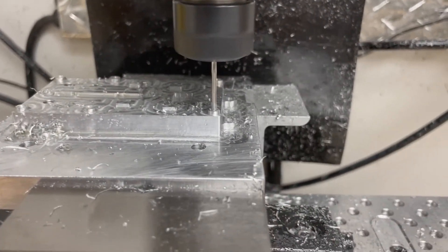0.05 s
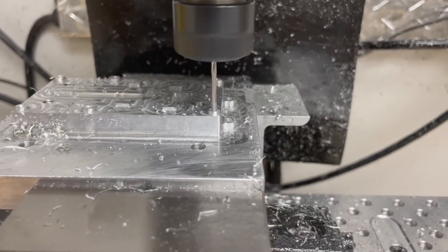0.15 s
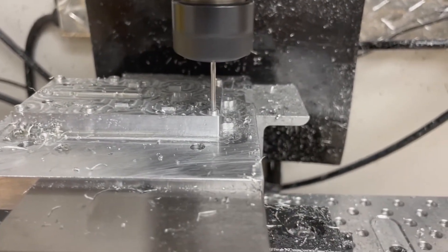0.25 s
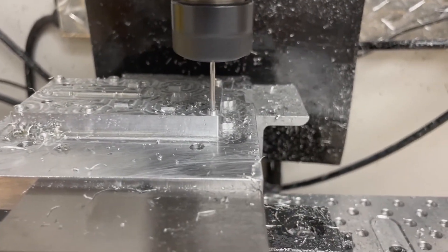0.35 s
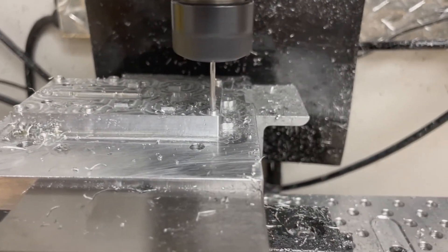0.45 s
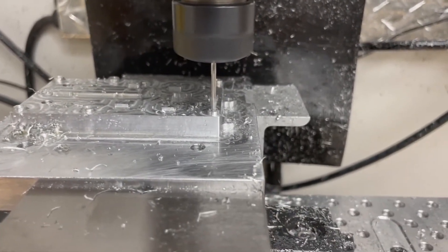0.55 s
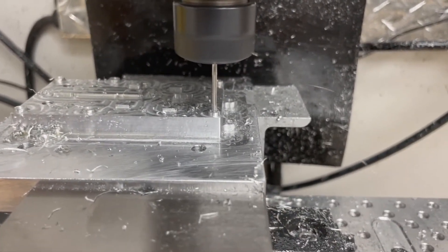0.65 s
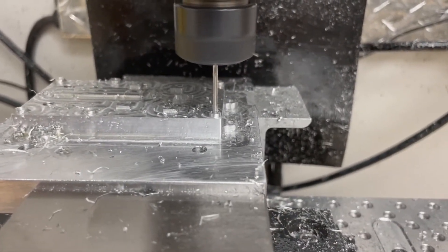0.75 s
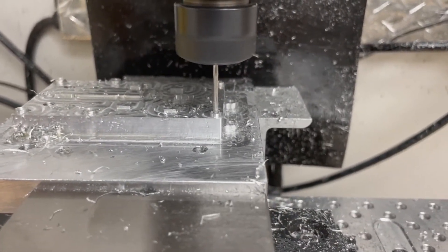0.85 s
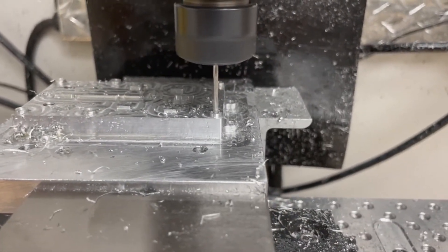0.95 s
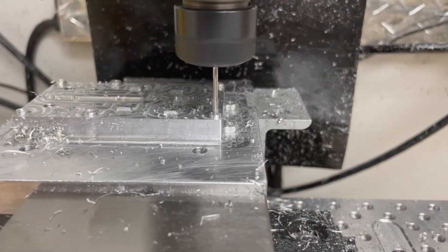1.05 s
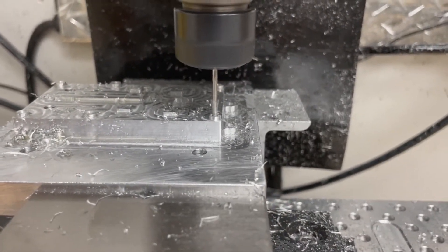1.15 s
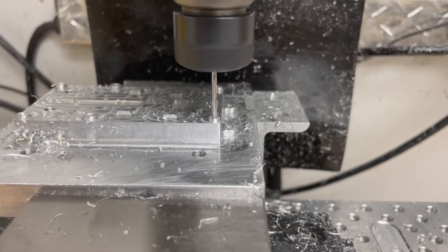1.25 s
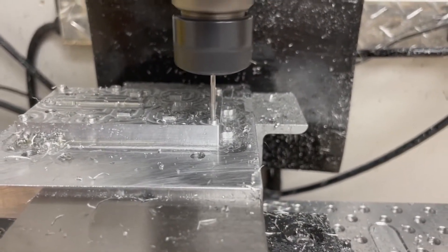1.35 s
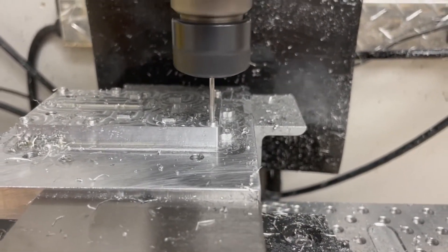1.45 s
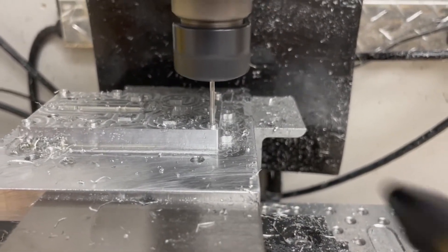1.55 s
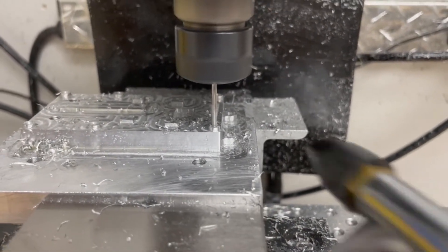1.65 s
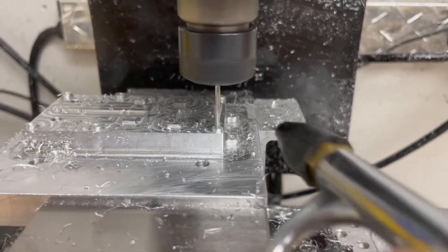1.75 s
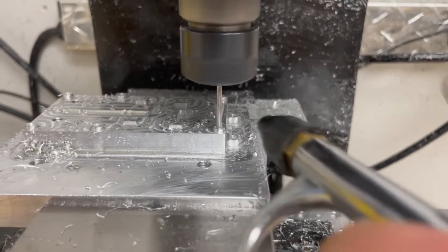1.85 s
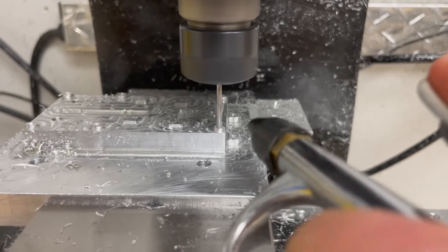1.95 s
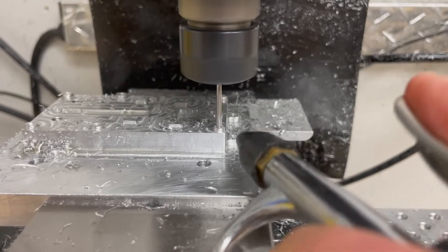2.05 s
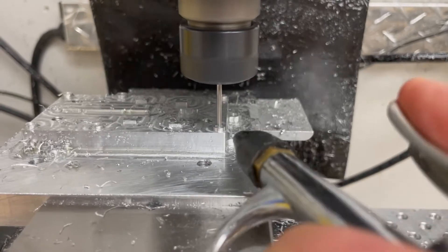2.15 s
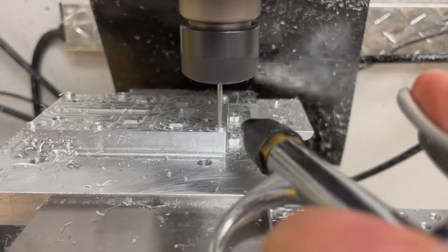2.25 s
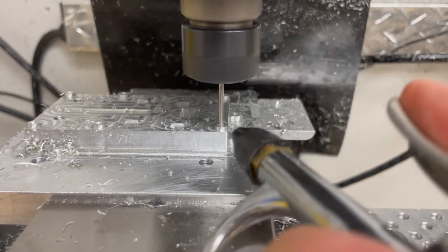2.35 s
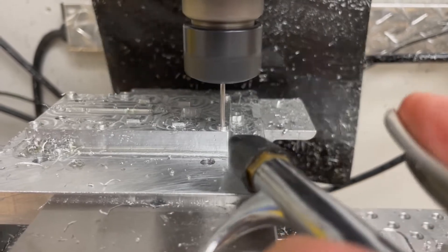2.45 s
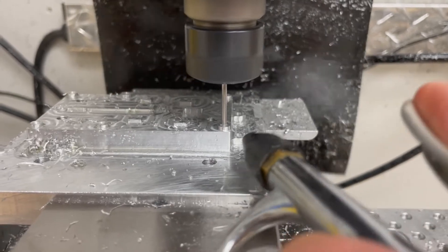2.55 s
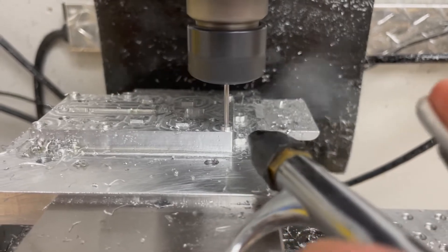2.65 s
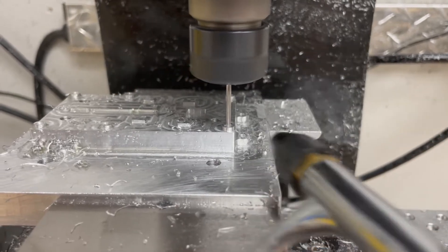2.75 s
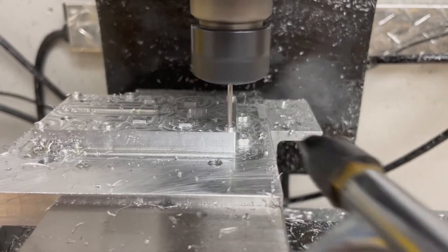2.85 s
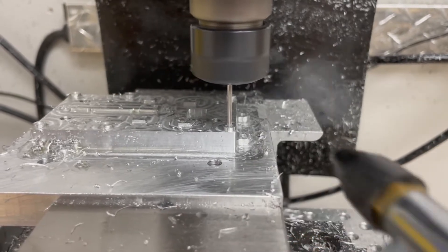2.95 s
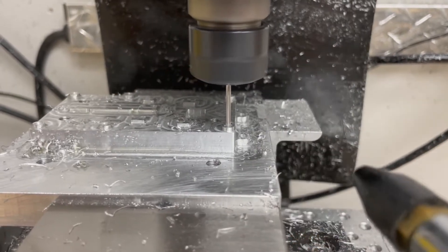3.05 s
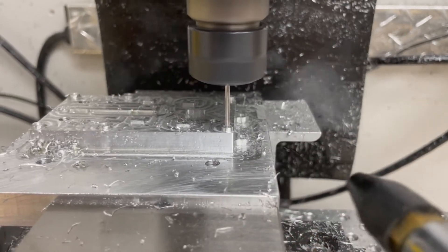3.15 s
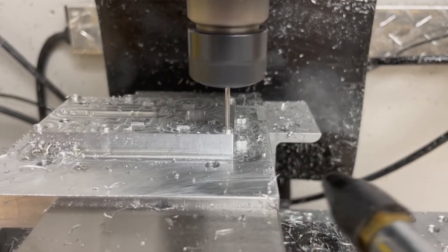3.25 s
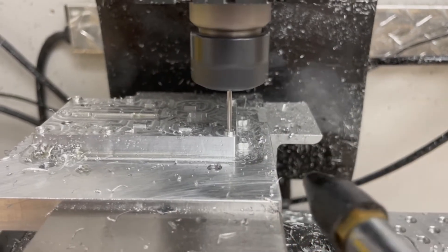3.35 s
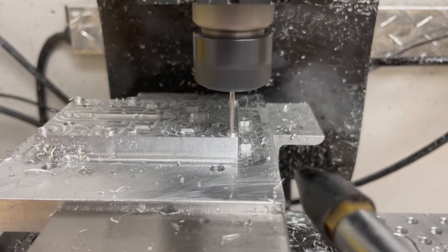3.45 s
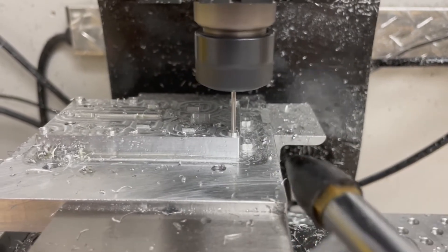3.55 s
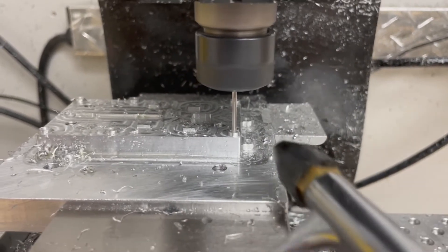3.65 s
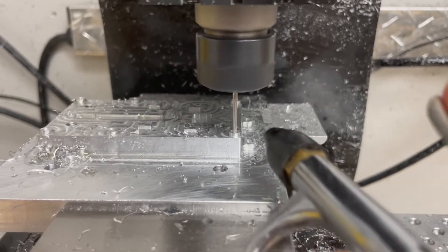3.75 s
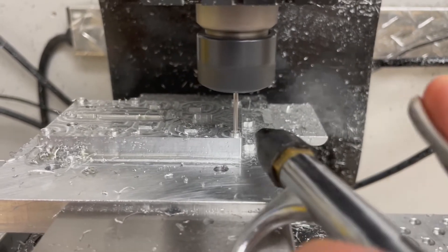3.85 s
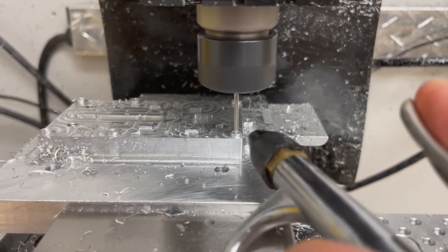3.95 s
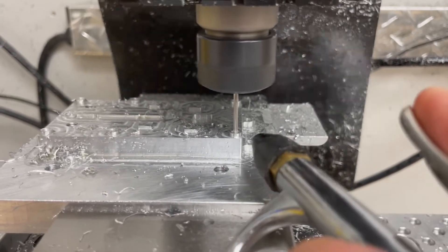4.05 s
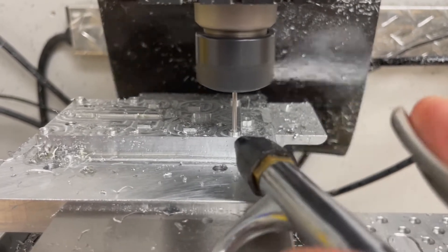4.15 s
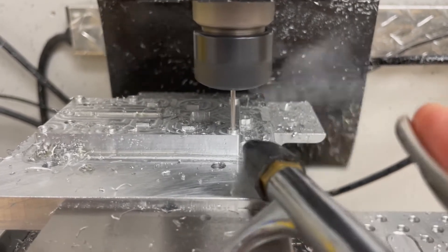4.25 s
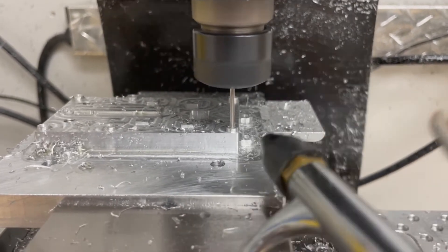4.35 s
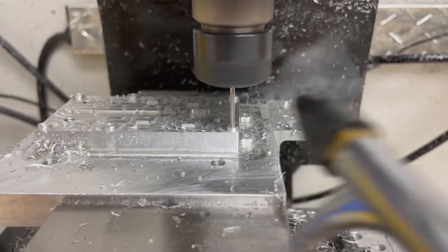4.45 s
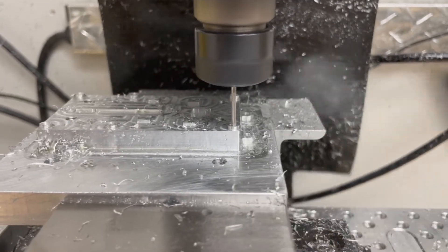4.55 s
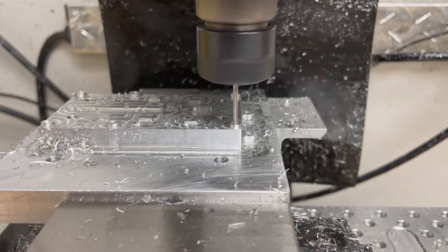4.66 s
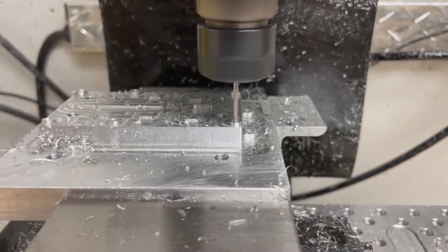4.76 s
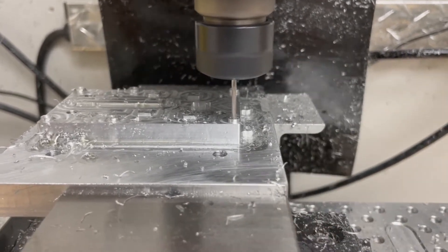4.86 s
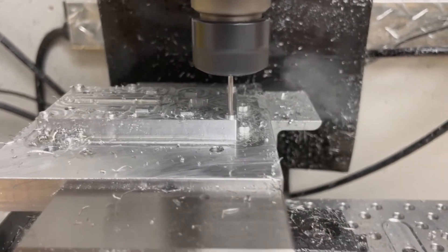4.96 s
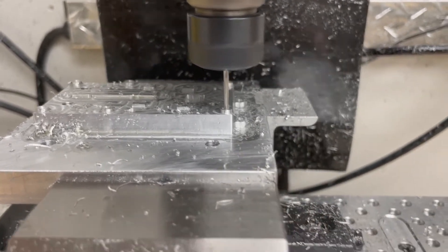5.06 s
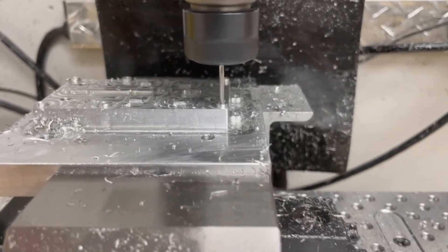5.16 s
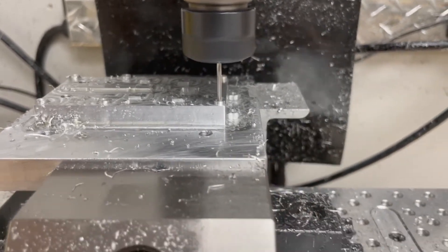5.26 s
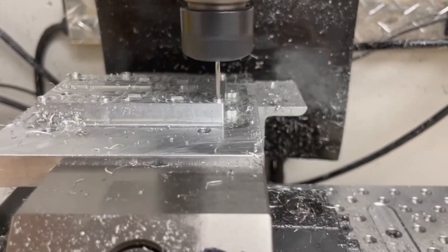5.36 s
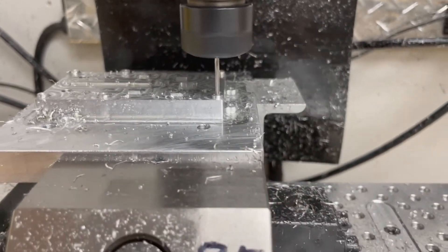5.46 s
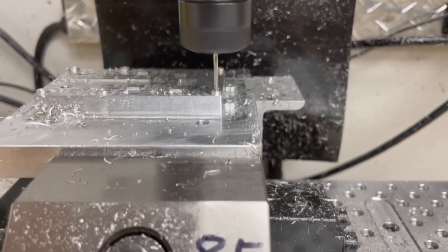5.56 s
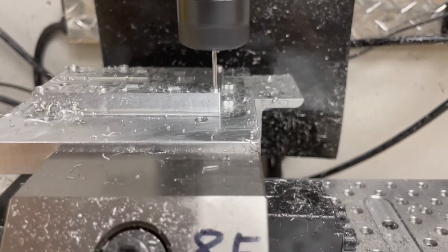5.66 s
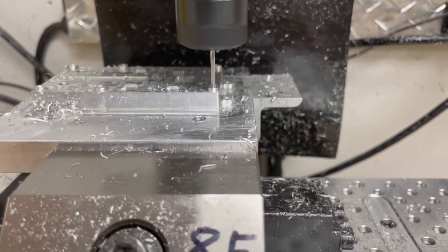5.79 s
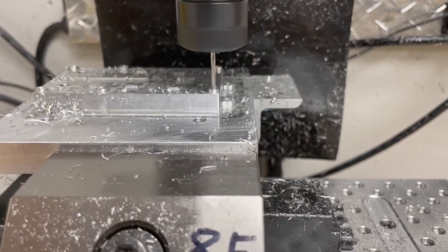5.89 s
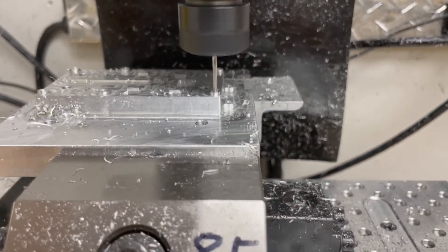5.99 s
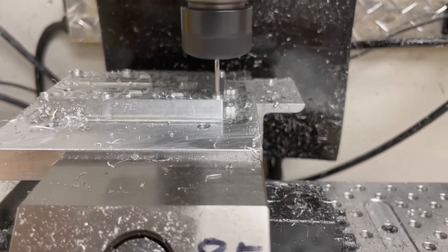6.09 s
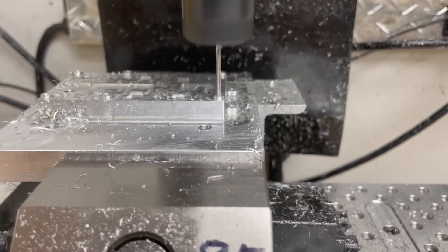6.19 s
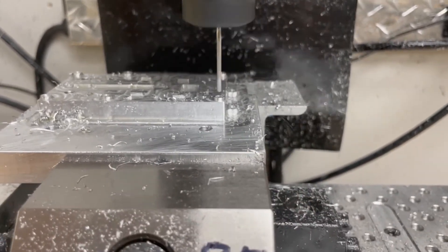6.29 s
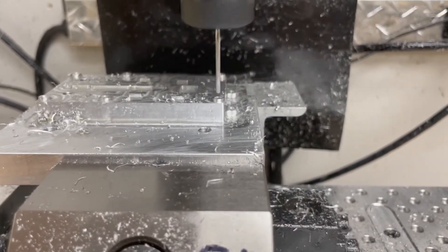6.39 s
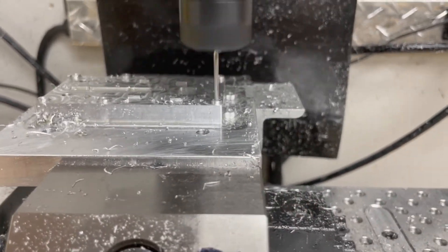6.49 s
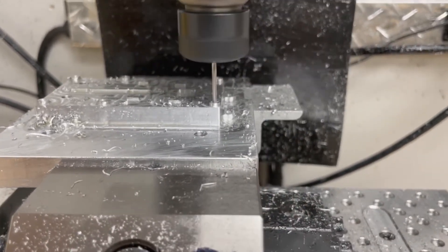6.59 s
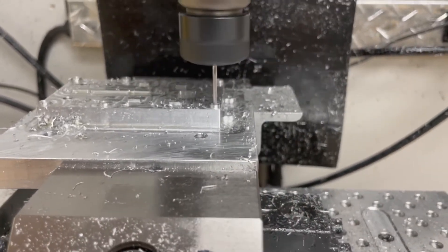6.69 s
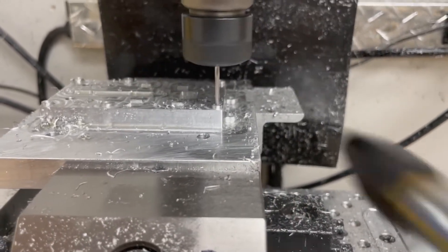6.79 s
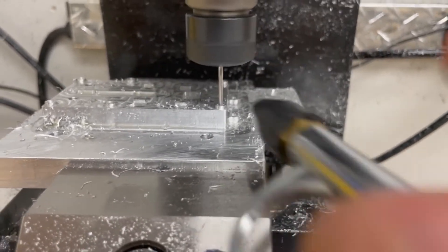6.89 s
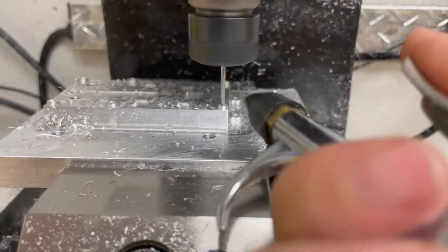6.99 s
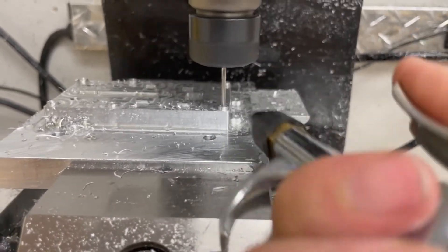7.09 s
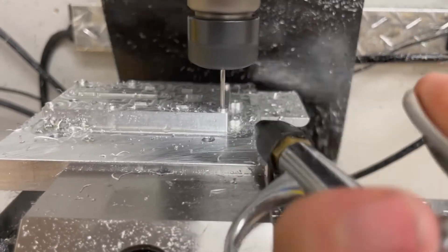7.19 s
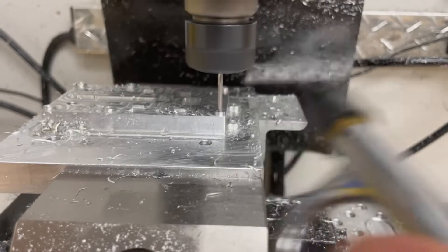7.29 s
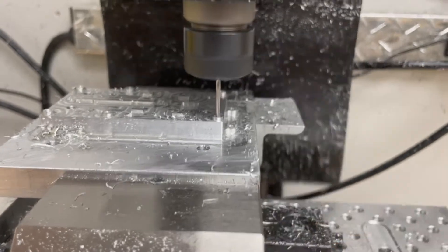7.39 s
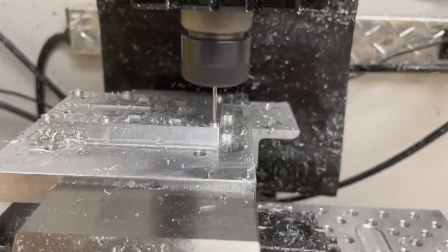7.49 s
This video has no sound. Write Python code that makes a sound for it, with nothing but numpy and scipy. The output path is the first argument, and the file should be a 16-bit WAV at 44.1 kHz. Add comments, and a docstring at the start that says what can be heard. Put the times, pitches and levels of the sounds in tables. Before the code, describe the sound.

Close up, a fast spindle hums and chatters through aluminium with hissing mist, interrupted by sharp puffs of compressed air.

```python
"""Milling machine and air gun

A small mill drills aluminium at about 2700 rpm, close up, while a mist nozzle hisses past the tool.
The spindle rings the frame, the belt whine wavers, the flutes chatter and the axes hum as they move.
Five short blasts from an air gun clear the chips; the first buffets the microphone hardest.
The machine sounds fainter after each pair of blasts."""
import sys
import numpy as np
from scipy import signal
from scipy.fft import rfft, irfft
from scipy.io import wavfile

SR = 44100
rng = np.random.default_rng(int(sys.argv[2]) if len(sys.argv) > 2 else 0)


def store_pcm(level_fs):
    """Save levels as 16-bit WAV."""
    pcm = np.round(np.clip(level_fs, -1, 1) * 32767).astype(np.int16)
    wavfile.write(sys.argv[1], SR, np.atleast_2d(pcm).T)


N = 332051
T = np.arange(N) / SR
FREQS = np.fft.rfftfreq(N, 1 / SR) + .001
SPINDLE_HZ = 44.97

# air gun blasts, relative levels: valve fully open t/s, hold/s, jet/dB, splash/dB, roar/dB, sag/(dB/s)
BLASTS = [ (2.063, .184, -16.7, -30.5, -34.8, 129), (2.333, 0.13, -26, -38.5, -41, 8),
          (3.969, 0.12, -19, -41.5, -35.5, 68), (4.237, 0.11, -19, -38.5, -37, 119),
          (7.066, 0.092, -17.5, -29.2, -33, 120), ]


def undb(db):
    """Decibels to gain."""
    return 10 ** (np.asarray(db) / 20)


def unit(x):
    """Scale to rms 1."""
    return x / np.sqrt(np.mean(x ** 2))


def over_hz(points):
    """Join (f/Hz, value) points on a log-frequency axis."""
    hz, value = np.transpose(points)
    return np.interp(np.log(FREQS), np.log(hz), value)


def resonances(modes):
    """Gain per frequency of a body with modes (f/Hz, width/Hz, level/dB)."""
    powers = (undb(db) ** 2 / (1 + ((FREQS - hz) / (.75 * width)) ** 2) ** 2 for hz, width, db in modes)
    return np.sqrt(sum(powers))


def shape(x, gain):
    """Filter by a gain per frequency; rms 1."""
    return unit(irfft(rfft(x) * gain, N))


def noise():
    """White noise."""
    return rng.standard_normal(N)


def walk(rate):
    """Smooth random wander with spread 1; a higher rate makes it more restless."""
    path = signal.resample(rng.standard_normal(4096), 32768)
    return np.interp(24 * rate * T % 32768, np.arange(32768), path)


def tone(hz, drift, drift_rate):
    """A sine of rms 1 whose pitch strays by the share drift."""
    pitch_hz = hz * (1 + drift * walk(drift_rate))
    return np.sqrt(2) * np.sin(2 * np.pi * (np.cumsum(pitch_hz) / SR + rng.random()))


def swell(middle, half):
    """A bell-shaped rise and fall, down to 1/e at half seconds from its middle."""
    return np.exp(-((T - middle) / half) ** 2)


def throb(turn, turn_db, flute_db):
    """Gain that swings once a spindle turn, and once more for each of the two flutes."""
    return undb(turn_db * np.cos(turn) + flute_db * np.cos(2 * turn))


def rough_spots(turn, spread):
    """The same rough spots in the bearings come round on every turn, never quite equally loud."""
    starts = np.diff(np.floor(turn / (2 * np.pi)), prepend=0) * (1 + spread * noise())
    one_turn = irfft(np.exp(2j * np.pi * rng.random(int(SR / SPINDLE_HZ / 2))))
    return unit(signal.fftconvolve(starts, one_turn)[:N])


def axes(ramp_s=0.039):
    """A moving axis hums unevenly while its slide rumbles and scrapes."""
    # slide scrapes: middle t/s, half length/s, f/Hz, width/Hz, level/dB
    scrapes = [(5.424, 0.033, 686, 200, -62), (6.197, 0.072, 1150, 900, -56.5), (6.33, 0.24, 820, 200, -65),
               (6.362, 0.035, 270, 200, -56.5)]
    # axis motor moves: start t/s, end t/s, f/Hz, hum/dB, rumble/dB
    moves = [(3.642, 3.728, 180, -56.5, -61.5), (3.738, 3.963, 178, -62, -66),
             (6.074, 6.115, 176.6, -60, -66), (6.07, 6.62, 114.3, -65.5, -76),
             (6.3, 6.399, 179, -57.5, -77)]
    rumble = shape(noise(), 1 / (1 + (FREQS / 450) ** 4) / (1 + (90 / FREQS) ** 4))
    out = np.zeros(N)
    for middle, half, hz, width, db in scrapes:
        out += undb(db) * swell(middle, half) * shape(noise(), resonances([(hz, width, 0)]))
    for start, end, hz, hum_db, rumble_db in moves:
        moving = np.clip(np.minimum(T - start, end - T) / ramp_s + .5, 0, 1)
        hum = undb(hum_db + 3.3 * walk(22)) * tone(hz, drift=0.0595, drift_rate=32)
        out += moving * (hum + undb(rumble_db) * rumble)
    return out


def frame(turn):
    """The bearings rub and ring the frame; the motor adds steady tones."""
    # resonances of head and table: f/Hz, width/Hz, relative level/dB
    modes = [(193, 68, -3), (295, 54, -7.5), (383, 77, -4), (540, 30, -17), (670, 240, -12.5),
             (880, 49, -14), (1118, 156, -6.5), (1583, 104, -5.5), (1836, 180, 1), (2096, 150, -8.5),
             (2630, 305, -6.5), (3580, 250, -5)]
    # motor and bearing tones: f/Hz, relative level/dB
    tones = [(178, -18), (377, -3.5), (402, -9.5), (538, -9), (667, -14), (802, -13), (867, -8.5),
             (903, -4.5), (947, -12.5), (1114, -5), (1560, -2.5), (1740, -13), (2730, 0), (2765, -0.5)]
    rub = noise() + undb(-2.5) * rough_spots(turn, spread=0.095)
    rub *= throb(turn, turn_db=-0.1, flute_db=0)
    ring = shape(rub, resonances(modes) / (1 + (40 / FREQS) ** 8))
    hum = sum(undb(db + 2.1 * walk(4.6)) * tone(hz, drift=0.00197, drift_rate=12) for hz, db in tones)
    return undb(1.5 + .5 * walk(16)) * ring + undb(-3.5) * unit(hum)


def belt(turn, lap_hz=1.47):
    """The belt's whine rises and swells once a lap; the pulley's turn splits it into side tones."""
    lap = 2 * np.pi * lap_hz * (T - .04)
    tension = 0.613 * np.cos(lap) + 0.34 * np.cos(2 * lap)
    whine = tone(1845 + 30 * tension, drift=.0015, drift_rate=12)
    pulley = 1 + 1.5 * np.cos(turn + .5 * walk(4))
    surge = undb(2.2 * tension + 2 * walk(8))
    return undb(-2) * unit(whine * pulley * surge)


def mist(turn):
    """The turning tool chops the mist jet; the motor drive whistles thinly above it."""
    # hiss of the nozzle: f/Hz, relative level/dB
    spectrum = [(300, -28), (3100, -26), (5000, -17.3), (6400, -12.7), (7300, -7), (8500, -4), (9400, 0),
                (10400, -2), (11700, -9), (13500, -9), (14800, -4), (15700, -4.8), (16000, -12)]
    hiss = shape(noise(), undb(over_hz(spectrum)))
    chop = throb(turn, turn_db=2.7, flute_db=.6) * undb(.5 * walk(60))
    whistle = tone(10345, drift=.0003, drift_rate=4) * undb(2 * walk(5))
    return undb(4) * hiss * chop + undb(-12.5) * whistle


def cutter(turn, sharpness=2.2):
    """The flutes scrape the work, and each bite sets the tool chattering for a few milliseconds."""
    # broad resonances of vice, work and tool: f/Hz, width/Hz, relative level/dB
    modes = [(66, 22, -1.5), (2760, 190, -19), (3620, 86, -6.5), (3940, 160, -9), (4280, 260, -5),
             (4490, 190, -7), (5470, 910, -6.3), (6980, 750, -3)]
    # tool chatter: f/Hz, relative level/dB, bursts per turn
    chatter_tones = [(1894, -7, 2), (2830, -9.5, 2), (4250, -2, 1), (4683, -5, 1)]
    scrape = shape(noise() * throb(turn, turn_db=2.5, flute_db=.8), resonances(modes))
    chatter = np.zeros(N)
    for hz, db, bursts in chatter_tones:
        bite = np.exp(sharpness / bursts ** 2 * np.cos(bursts * turn + 2 * np.pi * rng.random()))
        chatter += undb(db + 0.73 * walk(12)) * unit(bite * tone(hz, drift=0.00094, drift_rate=10))
    return undb(-1) * scrape + undb(-4.5) * chatter


def squeals():
    """Now and then the tool's chatter swells at one pitch and dies away."""
    # tool squeals: middle t/s, half length/s, f/Hz, level/dB
    events = [(0.694, 0.08, 4060, -48), (0.75, 0.028, 1885, -51), (1.34, .03, 4210, -49.5),
              (1.387, 0.045, 1917, -46.5), (3.44, 0.063, 1900, -50), (4.817, 0.06, 1880, -56),
              (6.745, 0.55, 1811, -56)]
    return sum(undb(db) * swell(middle, half) * tone(hz, drift=0.00188, drift_rate=15)
               for middle, half, hz, db in events)


def buffet(corner_hz=225):
    """Eddies from the air gun thump the microphone and leave a low boom."""
    # gusts on the microphone: middle t/s, half length/s, level/dB
    gusts = [(2.099, 0.011, -27), (2.123, 0.0077, -13), (2.148, 0.02, -26.5), (3.99, 0.021, -41),
             (4.063, 0.025, -39), (4.269, 0.024, -43.5), (7.08, 0.0064, -40.5)]
    # booms after a blast: t/s, f/Hz, level/dB, t60/s
    booms = [(2.13, 50.4, -48, 1), (4.089, 48.4, -50.5, 1)]
    eddies = shape(noise(), 1 / (1 + (FREQS / corner_hz) ** 2) / (1 + (60 / FREQS) ** 4))
    out = eddies * sum(undb(db) * swell(middle, half) for middle, half, db in gusts)
    for start, hz, db, t60 in booms:
        age = np.maximum(T - start, 0)
        out += undb(db - 60 * age / t60) * np.sin(2 * np.pi * hz * age)
    return out


def chips(per_s, spread_db):
    """Chips tick at random, a few of them hard; rms 1."""
    hit = rng.random(N) < per_s / SR
    return unit(hit * np.sign(noise()) * undb(spread_db * rng.random(N)))


def puff(start, hold, sag_db_per_s, open_db_per_s=1100, close_db_per_s=1100):
    """Gain of one spurt of air: it rises, sags while the valve is held, and is shut off."""
    age = T - start
    attack_db = open_db_per_s * np.minimum(age, 0)
    sag_db = sag_db_per_s * np.clip(age, 0, hold)
    release_db = close_db_per_s * np.maximum(age - hold, 0)
    return undb(attack_db - sag_db - release_db)


def air_gun(echo_gain=0.18):
    """Each blast is a turbulent jet that splashes and roars on the work and throws chips about."""
    # the valve leaks as the trigger is first squeezed, relative levels: t/s, hold/s, jet/dB, splash/dB
    leaks = [(2.03, .022, -38, -39), (6.985, .067, -39.5, -48)]
    # colours of the bright jet, its splash and its lower roar: f/Hz, relative level/dB
    jet_spectrum = [(2000, -30), (4500, -22), (6300, -9), (7500, 0), (8400, -2), (9800, 0), (11400, -4),
                    (12000, -4), (13300, -9), (14300, -3), (14900, -5), (15600, 0)]
    splash_spectrum = [(1500, -19), (3100, -7), (4400, -1), (5400, -3), (7500, -11.5)]
    roar_spectrum = [(60, -39), (250, -9), (700, -9), (1400, -0.5), (2200, 2.5), (3100, -12), (6000, -18)]
    # echo of the jet off the work: t/s, delay/s
    echo_delays = [(2.5, 0.00012), (3.98, 0.000086), (4.09, 0.00012), (4.22, 0.00011), (4.3, 0.00011),
                   (7.05, 0.00013)]
    jet_gain, splash_gain, roar_gain = np.zeros((3, N))
    for start, hold, jet_db, splash_db, roar_db, sag in BLASTS:
        jet_gain += undb(jet_db) * puff(start, hold, sag)
        splash_gain += undb(splash_db) * puff(start, hold, 0.83 * sag)
        roar_gain += undb(roar_db) * puff(start, hold, 0.62 * sag)
    for start, hold, jet_db, splash_db in leaks:
        leak = puff(start, hold, sag_db_per_s=0, open_db_per_s=260)
        jet_gain += undb(jet_db) * leak
        splash_gain += undb(splash_db) * leak
    ticks = .3 * chips(per_s=900, spread_db=9)
    jet = undb(5) * shape(noise() + ticks, undb(over_hz(jet_spectrum)))
    splash = undb(2.5) * shape(noise(), undb(over_hz(splash_spectrum)))
    roar = undb(1) * shape(noise(), undb(over_hz(roar_spectrum)))
    air = (jet_gain * jet + splash_gain * splash + roar_gain * roar) * undb(walk(110))
    # the echo cuts a notch that sweeps as the nozzle moves
    delay_s = np.interp(T, *np.transpose(echo_delays))
    return air + echo_gain * np.interp(T - delay_s, T, air)


def dip(depth_db=-6.5, fall_s=.04, linger_s=0.052, recover_s=.085):
    """Level change in dB: the machine dips under each blast, stays down a moment and comes back."""
    dips = []
    for start, hold, *_ in BLASTS:
        corners_s = np.cumsum([-fall_s / 2, fall_s, hold + linger_s - fall_s / 2, recover_s])
        dips.append(np.interp(T - start, corners_s, [0, 1, 1, 0]))
    return depth_db * np.max(dips, axis=0)


def microphone_ports(x, t60=.11):
    """Two ports hear the sound at different phases, each with shifting scatter off the moving machine."""
    # phase between the ports: f/Hz, lead of left/rad
    phase = [(100, 0), (600, .6), (1100, .2), (1800, 1.8), (2400, .8), (3100, .1), (3600, 1.4), (4400, 1),
             (5700, 1.9), (6700, .7), (7500, 1.3), (8300, 2.9), (8800, 3.3), (10300, 6.1), (11300, 6.5),
             (12200, 9.2), (13200, 9.6), (14300, 12.3), (16000, 13.0)]
    # balance of the ports: f/Hz, left minus right/dB
    balance = [(150, -0.5), (450, -1), (900, 0), (1300, 0), (2800, 3), (3500, -1), (4300, 3.5), (5400, 1.5),
               (6500, -3.5), (8000, -0.5)]
    # scatter against direct sound: f/Hz, level/dB
    scatter_spectrum = [(100, -12), (600, -4), (1500, -10.5), (5000, 2), (7500, -7.5), (8600, -47),
                        (10000, -1.5), (12700, -47), (15000, -12)]
    direct = rfft(x)
    left = np.exp(.5j * over_hz(phase)) * undb(over_hz(balance) / 2)
    right = 1 / left
    channels = []
    for port in (left, right):
        tail = noise() * undb(-60 * T / t60)
        reflections = rfft(tail / np.linalg.norm(tail)) * undb(over_hz(scatter_spectrum))
        shift_hz = 60 + 30 * walk(10)
        shifting = np.sqrt(2) * np.sin(2 * np.pi * np.cumsum(shift_hz) / SR)
        scatter = rfft(x * shifting) * reflections
        channels.append(irfft(direct * port + np.abs(port) * scatter, N))
    return np.array(channels)


def scene():
    """The spindle's turn drives frame, belt, cutter and mist; squeals, air and axes come on top."""
    # fader of the running machine: t/s, level/dB
    fader = [(0, -39.5), (2.04, -39.5), (2.2, -45.5), (3.93, -43.5), (4.06, -47.5), (5.7, -49.5),
             (7.53, -48.5)]
    # how hard the tool bites, running almost free around 3.3 s: t/s, level/dB
    bite = [(0, 0.5), (2.65, -1.5), (3.2, -12), (3.9, -6.5), (4.45, -2.5), (6.8, -0.5), (7.53, 3)]
    level_db = np.interp(T, *np.transpose(fader))
    bite_db = np.interp(T, *np.transpose(bite))
    dip_db = dip()
    turn = 2 * np.pi * (np.cumsum(SPINDLE_HZ + .05 * walk(2)) / SR + .5)  # spindle angle/rad
    drive = undb(level_db + dip_db - 9 + 0.24 * bite_db) * (frame(turn) + belt(turn))
    cut = undb(level_db + dip_db - 6 + bite_db) * cutter(turn - 1.5)
    spray = undb(level_db + 0.86 * dip_db) * mist(turn)
    return microphone_ports(drive + cut + spray + squeals() + air_gun() + axes() + buffet())


def record(dry):
    """A steep low-pass trims the very top of the hiss."""
    top_hz = 15900
    return signal.sosfilt(signal.ellip(12, .2, 90, top_hz, fs=SR, output="sos"), dry)


dry = scene()
out = record(dry)
store_pcm(out)
```